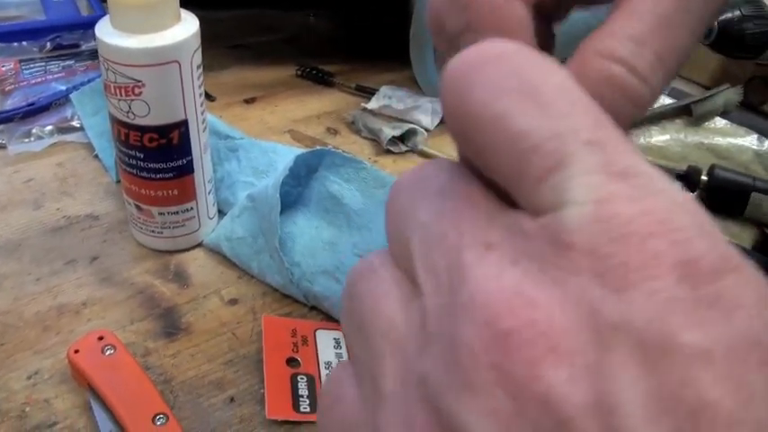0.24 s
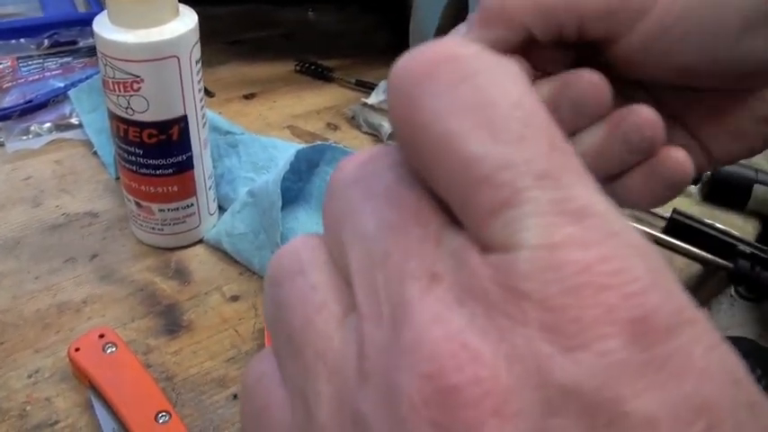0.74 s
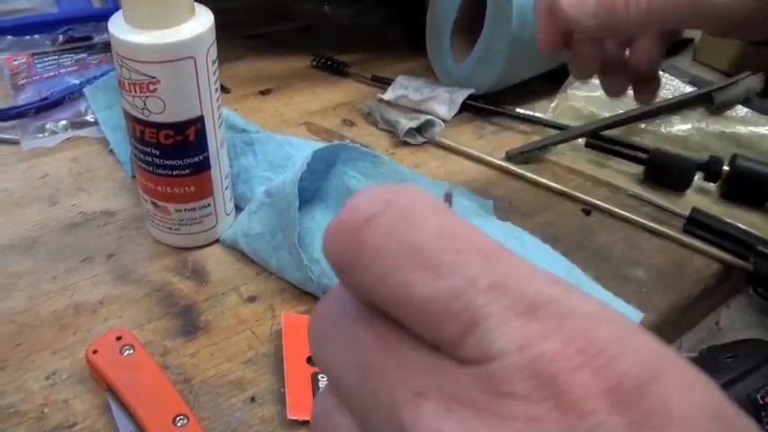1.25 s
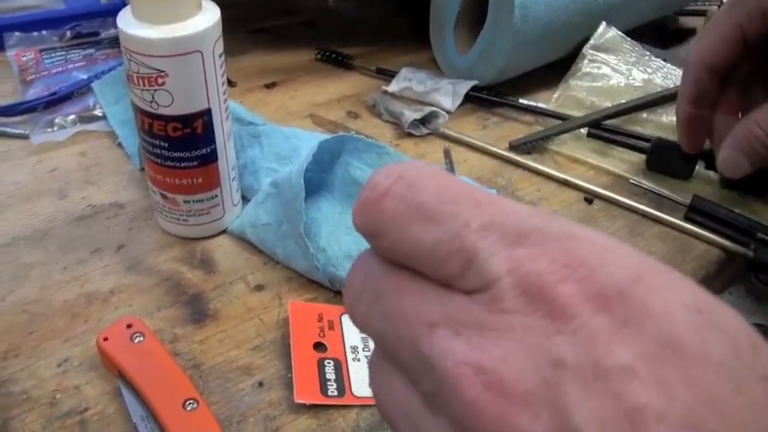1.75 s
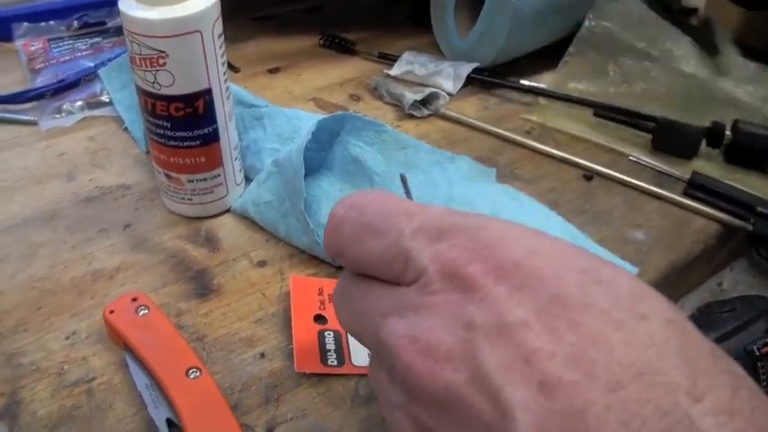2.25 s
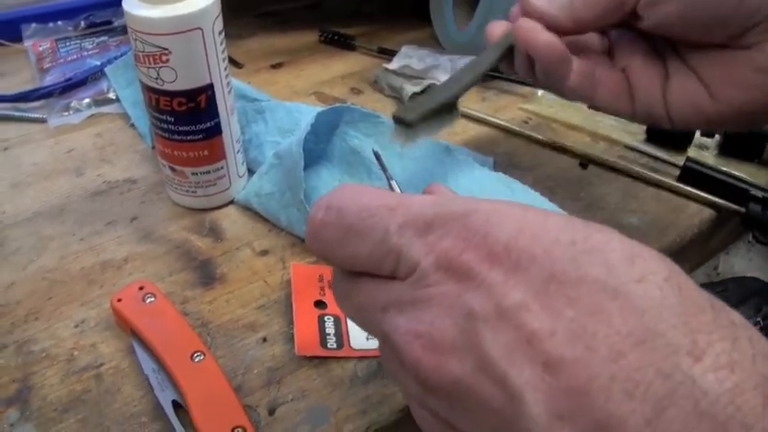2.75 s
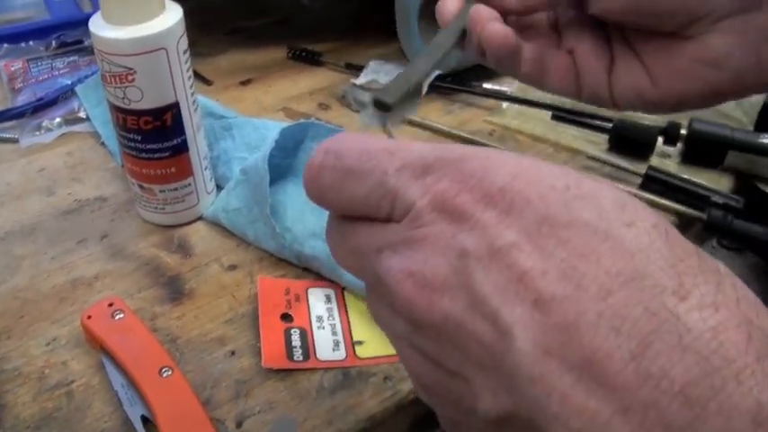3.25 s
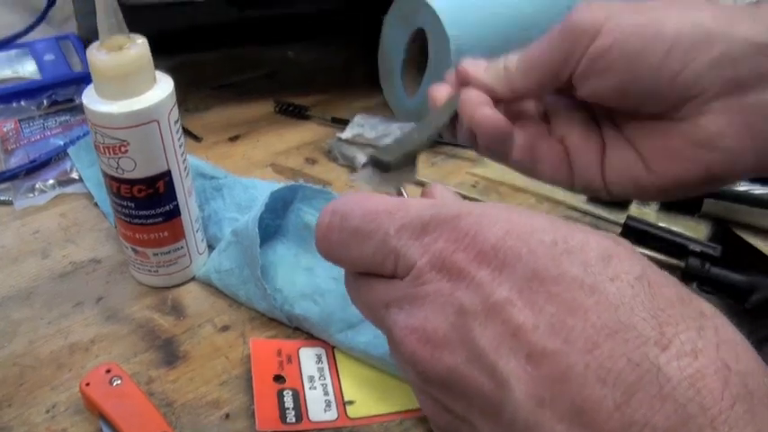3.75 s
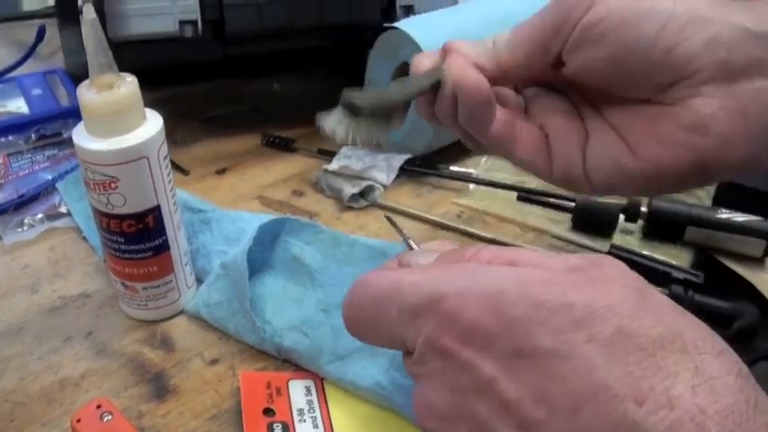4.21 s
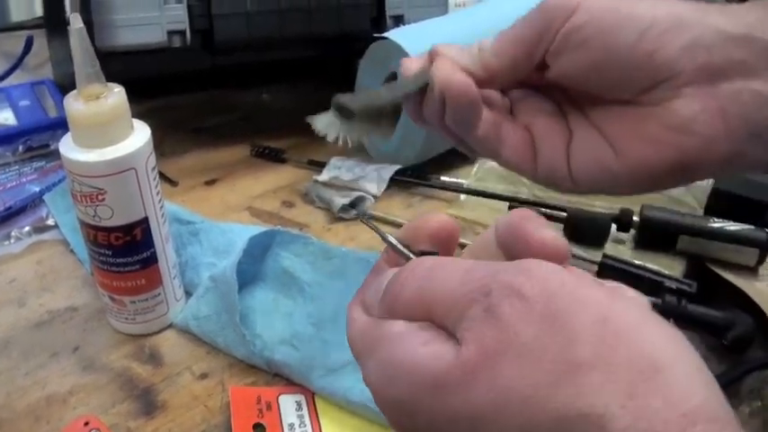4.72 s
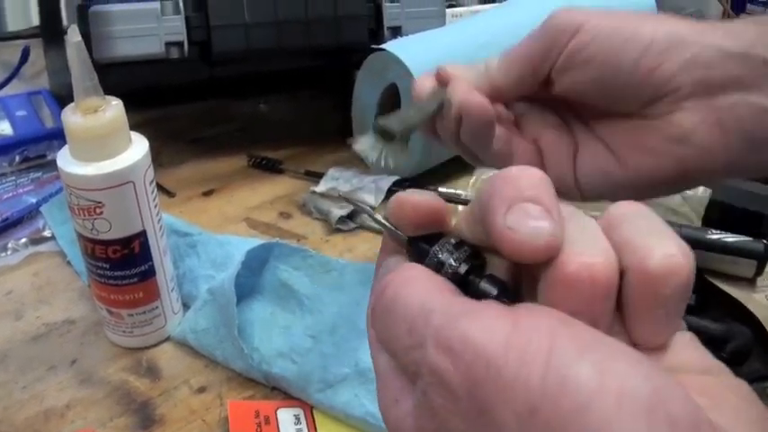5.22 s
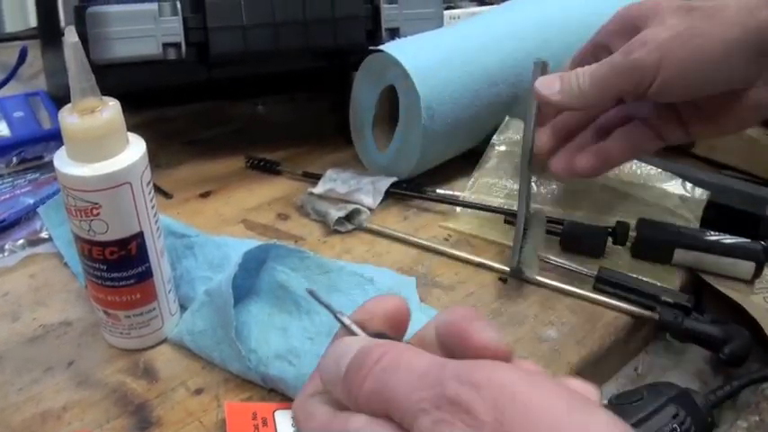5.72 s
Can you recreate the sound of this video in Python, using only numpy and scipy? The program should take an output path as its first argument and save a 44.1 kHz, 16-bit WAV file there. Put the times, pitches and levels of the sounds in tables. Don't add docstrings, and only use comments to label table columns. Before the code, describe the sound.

A small, quiet shed with soft air hiss and weak mains hum, heard closely in stereo with a short dull room tail. From 0 to 1.3 seconds, a forearm slides faintly on the wooden bench while fingers rub and nails tick a tiny metal part. After a near-quiet gap with a faint drag and dull bump, a stiff brush is tugged from a pile at 2.05 to 2.55: rods knock and ring in an irregular loud clatter, plastic film crackles and the bench booms, with a second strong cluster near 2.36. From 2.75 to 5.46, eleven short, dry, bright brush strokes come roughly every quarter second, each with snapping bristles, sharp ticks and a hollow handle scrape; later ones ring the part more. Stray knocks sound near 3.35 to 3.42. Cloth rubs near 5.6, then the brush drops back at 5.8 to 5.95 with rattling knocks, strongest near 5.89.

```python
import sys
import numpy as np
from scipy import signal
from scipy.io import wavfile

SR = 44100
rng = np.random.default_rng(int(sys.argv[2]) if len(sys.argv) > 2 else 0)


def nominal_scale(level):
    x = np.asarray(level, float) / 20
    return 10 ** x


def digitize_waveform(pressure):
    field = np.atleast_2d(pressure).T
    bounded = np.clip(field, -1, 1)
    quanta = np.round(bounded * 32767).astype(np.int16)
    wavfile.write(sys.argv[1], SR, quanta)


N = 263277


def rms_one(x):
    return x / np.sqrt(np.mean(x ** 2) + 1e-20)


def at_hz(points, hz):
    table = np.array(points)
    return np.interp(np.log(hz), np.log(table[:, 0]), table[:, 1])


def drift(rate_hz):
    r = np.exp(-20 * np.pi * rate_hz / SR)
    slow = signal.lfilter([1], [1, -2 * r, r * r], rng.standard_normal(N // 10 + 4002))[4000:]
    return np.interp(np.arange(N) / 10, np.arange(len(slow)), rms_one(slow))


def band_pass(x, order, low_hz, high_hz):
    return signal.sosfilt(signal.butter(order, [low_hz, high_hz], "band", fs=SR, output="sos"), x)


def resonance(x, hz, width_hz):
    r = np.exp(-np.pi * width_hz / SR)
    feedback = [1, -2 * r * np.cos(2 * np.pi * hz / SR), r * r]
    return signal.lfilter(np.array([1, 0, -1]) * (1 - r * r) / 2, feedback, x)


def body(x, modes, ring_db):
    return x + sum(nominal_scale(ring_db + db) * resonance(x, hz, width_hz) for hz, width_hz, db in modes)


def colour(sources, spectrum, alike=None, patchy_db=0.):
    out = 0
    bottom_hz, top_hz = spectrum[0][0], spectrum[-1][0]
    edges = np.geomspace(bottom_hz, top_hz, int(3 * np.log2(top_hz / bottom_hz)))
    flicker = nominal_scale(patchy_db * drift(86))
    for k, (low_hz, high_hz) in enumerate(zip(edges, edges[1:])):
        band = band_pass(sources[k % len(sources)], 2, low_hz, high_hz)
        hz = np.sqrt(low_hz * high_hz)
        if alike:
            c = np.clip(at_hz(alike, hz), 0, 1)
            band = np.sqrt(1 + c) * band[0] + np.sqrt(1 - c) * band[1] * [[1], [-1]]
        out = out + nominal_scale(at_hz(spectrum, hz)) * band * np.roll(flicker, 9001 * k)
    return rms_one(out)


def grains(per_s, spread_db, clump_db, clump_hz):
    born = rng.random((4, N)) < per_s / SR
    size_db = spread_db * np.minimum(rng.exponential(1, (4, N)), 4)
    sizes = nominal_scale(size_db) * rng.standard_normal((4, N))
    return born * sizes * nominal_scale(clump_db * drift(clump_hz)) + 1e-18


def levels(spans):
    t, main, low = np.arange(N) / SR, np.zeros(N), np.zeros(N)
    for rows in spans:
        s, level_db, share_db = np.transpose(rows)
        on = slice(int(s[0] * SR), int(s[-1] * SR))
        gain = nominal_scale(np.interp(t[on], s, level_db))
        main[on] += gain
        low[on] += gain * nominal_scale(np.interp(t[on], s, share_db))
    return main, low


def swells(rows):
    onset_s, start_under_db = 0.00135, 9
    spans = []
    for s, crest_s, crest_db, fade_db_per_s, share_db in rows:
        top_s = max(crest_s, s)
        spans.append([(s - onset_s, crest_db - 11, share_db), (s, crest_db - start_under_db, share_db),
                      (top_s, crest_db, share_db), (top_s + 50 / fade_db_per_s, crest_db - 50, share_db)])
    return levels(spans)


def burst(noise, t60_s):
    t = np.arange(len(noise)) / SR
    return noise * nominal_scale(-60 * t / max(t60_s, .002)) * (1 - np.exp(-t / 0.000077))


def strike(noise, hz, t60_s):
    contact = 0.19 * burst(noise, 0.011)
    contact[1] += 1
    return resonance(contact, hz, np.log(1000) / np.pi / t60_s)


def place(hits):
    out = np.zeros(N + 4096)
    for s, peak_db, shape in hits:
        i = round(s * SR)
        out[i:i + len(shape)] += nominal_scale(peak_db) * shape / np.abs(shape).max()
    return out[:N]


# pitch_hz, level_db (per Hz)
AIR_TONE = [(13, -35), (22, -2), (40, -2.5), (123, -5), (171, -2.5), (392, 2.5), (463, -0.5), (682, 3),
            (1190, 0), (1330, -1), (2180, -3), (2510, -3.5), (9220, -13), (14800, -15), (16500, -29)]
# pitch_hz, likeness (0 to 1)
AIR_LIKENESS = [(60, 0.94), (150, 0.62), (380, 0.21), (950, 0.023), (2380, 0.015), (5980, 0.2),
                (15000, 0.88)]
# pitch_hz, level_db
MAINS_HUM = [(59.8, -81.5), (119.6, -74), (239, -76.5)]


def air():
    t = np.arange(N) / SR
    waver = nominal_scale(2 * drift(4))
    hum = sum(nominal_scale(db + 1.5) * waver * np.sin(2 * np.pi * hz * t) for hz, db in MAINS_HUM)
    level_db = -56.5 + .4 * drift(3)
    return nominal_scale(level_db) * colour(rng.standard_normal((2, 2, N)), AIR_TONE, alike=AIR_LIKENESS) + hum


# start_s, crest_s, end_s, crest_db, bright_share_db
FOREARM_SLIDES = [
    (-0.1, 0.008, 0.2, -58.5, -21),
    (1.33, 1.58, 2.3, -63, -8),
    (3.623, 3.72, 4.3, -60, -6),
    (4.4, 4.444, 4.56, -51.5, -7.5),
    (4.672, 4.704, 5.2, -62.5, -9),
    (5.524, 5.635, 5.74, -55.5, -0.5),
    (5.7, 5.79, 5.83, -55, 0),
]
# pitch_hz, width_hz, level_db
BOARD = [(237, 33, -3.5), (430, 45, -1.5), (576, 180, 1), (800, 86, -6.5), (1144, 140, -2)]
# pitch_hz, width_hz, level_db
SLEEVE = [(1600, 300, -8), (1970, 200, -3), (3260, 400, -5.5), (4680, 580, -3.5), (6500, 1500, -4.5),
          (11000, 5700, -5)]


def forearm():
    edge_db, alike = 9, 0.96
    spans = []
    for s, crest_s, until_s, db, share_db in FOREARM_SLIDES:
        spans.append([(max(s, 0), db - edge_db * (s > 0), share_db), (crest_s, db, share_db),
                      (min(until_s, N / SR), db - edge_db, share_db)])
    board, sleeve = levels(spans)
    mid, side = rng.standard_normal((2, N))
    friction = np.sqrt(1 + alike) * mid + np.sqrt(1 - alike) * side * [[1], [-1]]
    friction = friction * nominal_scale(0.64 * drift(30))

    def rub(modes):
        total = 0
        for k, (hz, width_hz, db) in enumerate(modes):
            total = total + (-1) ** k * nominal_scale(db) * resonance(friction, hz, width_hz) / np.sqrt(width_hz)
        return rms_one(total)

    return (board * rub(BOARD) + sleeve * rub(SLEEVE)) * nominal_scale([[-1.1], [1.1]])


# start_s, peak_db, high_pitch_hz, low_mode_db (re peak)
NAIL_TICKS = [
    (0.61, -41, 11400, -24),
    (0.625, -41.5, 10200, -1),
    (0.635, -44, 7450, -5),
    (0.8001, -43, 6530, -25),
    (1.102, -48.5, 3300, -3),
    (1.109, -50, 7000, -12),
    (1.1894, -42, 10300, -2),
    (1.1995, -50, 6900, 5),
    (1.268, -40, 4270, -14),
]
# start_s, peak_db, high_pitch_hz, low_mode_db (re peak)
BRISTLE_TICKS = [(2.7482, -28.5, 10900, -18), (2.7605, -35, 10300, -12), (2.7779, -32, 10700, -29),
                 (3.014, -24, 7000, -43), (3.048, -30, 10300, -13), (3.0843, -26, 6800, -19),
                 (3.253, -43, 10600, -26), (3.291, -37, 7080, -27), (3.3052, -26, 10600, -18),
                 (3.32, -23, 7100, -27), (3.55, -25, 6770, -26), (3.608, -19, 5000, -22),
                 (3.8104, -23, 10300, -35), (3.818, -29, 7000, -20), (3.825, -31, 4700, -8),
                 (3.8384, -26, 11500, -21), (3.9005, -23, 11100, -20), (3.906, -27.5, 10300, -14),
                 (4.0784, -24, 10900, -3), (4.1154, -40, 12900, -19), (4.123, -34.5, 4740, -16),
                 (4.136, -33, 11400, -15), (4.143, -37, 9000, -13), (4.152, -36, 10100, -25),
                 (4.156, -20, 9600, -22), (4.1647, -25, 7010, -24), (4.167, -15, 10360, -31),
                 (4.1773, -27, 10500, -15), (4.1914, -35, 11000, -12), (4.3591, -30, 9300, -5),
                 (4.6146, -24.5, 10200, -5), (4.654, -24, 10300, -2), (4.8599, -22, 7300, -4),
                 (4.8796, -22, 10300, -11), (5.1241, -24.5, 5140, -7), (5.1248, -23, 4400, -24),
                 (5.1239, -23, 7300, -20), (5.166, -28, 9500, -22), (5.378, -35, 9450, -14),
                 (5.3836, -35, 7200, -25), (5.4, -28, 10350, -21), (5.4019, -15, 10000, -22),
                 (5.4175, -30, 10500, -20), (5.4235, -30, 11100, -21), (5.4273, -16, 11600, -39),
                 (5.4634, -20, 4350, -17)]
# pitch_hz, width_hz, level_db
METAL_PART = [(4850, 860, -3.5), (7030, 420, 4.5), (10300, 120, 3), (11600, 450, -28)]
PART_LOWEST_HZ = 3596


def ticks():
    rows = NAIL_TICKS + BRISTLE_TICKS
    hits = []
    for noise, (s, peak_db, hz, low_db) in zip(rng.standard_normal((len(rows), 2048)), rows):
        crack = body(band_pass(burst(noise, 0.011), 2, 2800, 13000), METAL_PART, ring_db=0)
        hits.append((s, peak_db - 10.5, crack))
        hits.append((s, peak_db - 4.0, strike(noise, hz, 0.0055)))
        hits.append((s, peak_db + low_db, strike(noise, PART_LOWEST_HZ, 0.011)))
    return place(hits)


# start_s, crest_s, crest_db, fade_db_per_s, low_share_db
FINGER_SLIDES = [
    (0.612, 0.626, -56.5, 200, -9),
    (0.79, 0.8, -52, 310, -8),
    (0.885, 0.915, -55, 500, -26),
    (1.112, 1.12, -56.5, 1100, -25),
    (1.186, 1.19, -50.5, 550, -24),
]
# pitch_hz, level_db (per Hz)
SKIN_TONE = [(2000, -16), (5000, -1), (9000, 5), (13000, 6), (16500, -13)]
# pitch_hz, level_db (per Hz)
HANDLE_TONE = [(150, -6.5), (250, -8.5), (938, 1.5), (1160, 2.5), (1430, 0), (1790, -5.5), (2060, 4),
               (2600, 0), (3380, -38), (5720, -120)]


def fingers():
    main, low = swells(FINGER_SLIDES)
    rub = grains(12000, spread_db=1.2, clump_db=1.5, clump_hz=80)
    return main * colour(rub, SKIN_TONE) + low * colour(rub, HANDLE_TONE)


# start_s, peak_db, low_pitch_hz, high_pitch_hz, hardness_db
TUG_KNOCKS = [(2.04, -44, 800, 1500, -8), (2.053, -40, 1840, 2980, -15), (2.0644, -7.5, 1420, 3000, 5.5),
              (2.0722, -14, 1290, 3100, 3), (2.0826, -13.5, 1890, 4000, -6), (2.092, -37, 1460, 4000, -7),
              (2.103, -28, 1300, 4000, -9), (2.125, -26, 1900, 3830, 0), (2.1312, -21, 1450, 3200, 5),
              (2.1384, -19, 1470, 4070, -2), (2.145, -16, 845, 4540, 5.5), (2.16, -29, 1960, 2380, -13.5),
              (2.173, -24, 1410, 4000, -1), (2.182, -28, 1900, 4800, -3), (2.196, -46, 800, 2400, -13),
              (2.2057, -23, 2060, 5600, 3), (2.2187, -28.5, 660, 2190, 10), (2.253, -35, 1650, 2550, -11.5),
              (2.2757, -43, 1500, 4500, 0), (2.2785, -18, 2800, 6100, -6.5), (2.295, -30, 1890, 3820, -5),
              (2.308, -27.5, 1850, 5000, -12), (2.3178, -31, 1900, 4000, -7), (2.335, -38, 1700, 3300, 0),
              (2.349, -27, 1400, 6200, 8),
              (2.359, -23, 580, 5470, 9), (2.363, -12, 975, 3580, 10), (2.3702, -14.5, 576, 3520, 5),
               (2.3787, -8.5, 2310, 7200, -8), (2.384, -8, 2220, 3140, 2), (2.4, -17.5, 1560, 2500, 3),
               (2.407, -26, 1540, 2510, -10), (2.412, -37, 1800, 3700, -3), (2.421, -46, 2000, 9000, 3),
               (2.432, -44, 1360, 2300, -10), (2.438, -33.5, 1790, 3240, -6), (2.443, -34, 990, 2780, -2),
               (2.45, -44, 1800, 2900, -4), (2.47, -43, 1900, 6200, 10), (2.478, -33, 1980, 2970, -7),
               (2.4872, -25, 2130, 3900, -2), (2.496, -38, 1500, 4200, -4), (2.506, -26, 1530, 3020, 6),
               (2.5091, -22, 1800, 5000, -3), (2.529, -47, 1200, 2600, 4), (2.536, -34.5, 1000, 4080, -6),
               (2.5482, -15.5, 2150, 7100, -2.5), (2.622, -45.5, 1410, 2260, -7),
               (2.669, -44, 2010, 2300, -3)]
# start_s, peak_db, low_pitch_hz, high_pitch_hz, hardness_db
DROP_KNOCKS = [(0.6227, -44, 1900, 2160, 0), (0.637, -44.5, 1100, 2070, -6), (0.8806, -40, 860, 2310, -5.5),
               (1.268, -49.5, 1800, 2700, -10), (1.3027, -55, 1600, 2430, -15),
               (1.6195, -51, 980, 1420, -12), (3.3515, -22, 1510, 6040, -2.5),
               (3.415, -28.5, 1530, 4600, -14), (3.4153, -41, 2070, 3400, -3),
               (3.4178, -30.5, 1090, 6500, -1), (5.808, -30, 1890, 8040, 11), (5.812, -32, 1490, 6600, -13),
               (5.817, -26.5, 1800, 5340, -5), (5.825, -39, 1700, 3300, 3), (5.8465, -17, 1630, 3900, -2.5),
               (5.8511, -35.5, 1600, 2900, -18), (5.8526, -35, 1600, 2600, -17),
               (5.857, -38, 1600, 5200, -17), (5.881, -33, 1300, 2310, -9), (5.885, -17, 1600, 8100, -2),
               (5.886, -10, 2950, 4160, -2.5), (5.886, -15.5, 1900, 4230, 1), (5.8863, -17, 910, 6500, 6),
               (5.927, -40, 1980, 6500, -13), (5.9222, -32, 2000, 8000, 6), (5.946, -32, 1560, 4100, -7)]


def knocks():
    low_cycles, high_cycles = 14, 24.4
    rows = TUG_KNOCKS + DROP_KNOCKS
    hits, thumps = [], []
    for noise, (s, peak_db, low_hz, high_hz, hard_db) in zip(rng.standard_normal((len(rows), 4096)), rows):
        low_peak_db, crack_peak_db = peak_db - 7 - hard_db, peak_db - 6 + hard_db
        rattle_peak_db = peak_db - 10.5 + 0.55 * min(hard_db + 4, 0)
        low_t60_s = low_cycles * nominal_scale(-0.29 * hard_db) / low_hz
        other = noise[::-1]
        hits.append((s, low_peak_db, strike(noise, low_hz, low_t60_s)))
        hits.append((s, peak_db - 1, strike(noise, high_hz, high_cycles / high_hz)))
        hits.append((s, low_peak_db - 10.5, strike(other, np.sqrt(low_hz * high_hz), 4.5 / low_hz)))
        hits.append((s, rattle_peak_db, band_pass(burst(other, .06), 1, 1200, 7000)))
        hits.append((s, crack_peak_db, band_pass(burst(noise, .006), 2, 5500, 13000)))
        push = burst(other, 0.0015)
        thump = resonance(push, 277, 38) + resonance(push, 460, 126) + resonance(push, 550, 150)
        thumps.append((s, low_peak_db - 20.5, thump))
    return place(hits), place(thumps)


# start_s, peak_db, low_pitch_hz, upper_pitch_hz, push_s
HAND_BUMPS = [(1.806, -49, 154, 290, 0.037), (2.998, -43.5, 580, 249, 0.015), (2.999, -49, 127, 230, 0.068),
              (3.798, -57, 50, 88.5, 0.046), (4.439, -57, 54, 89, 0.039), (5.752, -52, 135, 100, 0.028),
              (5.845, -47, 144, 275, 0.024), (2.158, -43.5, 131, 250, 0.036),
              (2.35, -37.5, 184, 239, 0.034), (5.88, -31, 276, 430, 0.018), (1.812, -47, 630, 880, 0.022),
              (5.122, -43, 420, 750, 0.0042)]


def bumps():
    def dull(push, hz):
        return resonance(resonance(push, hz, 0.33 * hz), hz, 0.33 * hz)

    t, hits = np.arange(4096) / SR, []
    noises = rng.standard_normal((len(HAND_BUMPS), 4096))
    for noise, (s, peak_db, low_hz, upper_hz, push_s) in zip(noises, HAND_BUMPS):
        push = noise * np.sin(np.pi * np.minimum(t / push_s, 1)) ** 2
        hits.append((s, peak_db, dull(push, low_hz) + nominal_scale(-5.0) * dull(push, upper_hz)))
    return place(hits)


# start_s, crest_s, crest_db, fade_db_per_s, bench_boom_db
WRAP_CRUMPLES = [(2.052, 2.058, -32, 700, -11), (2.061, 2.066, -18.5, 1500, -12.5),
                 (2.0715, 2.074, -26.5, 1100, -6), (2.081, 2.085, -26.5, 800, -8),
                 (2.09, 2.095, -42, 295, -1), (2.12, 2.15, -31, 446, -11.5), (2.19, 2.2, -37.5, 275, -6.5),
                 (2.2762, 2.278, -29, 1300, -8), (2.306, 2.308, -34.5, 300, -10.5),
                 (2.325, 2.353, -35, 909, -13), (2.358, 2.363, -19.5, 552, -6.5),
                 (2.376, 2.39, -25.5, 1600, -23), (2.396, 2.41, -37, 2090, 4),
                 (2.47, 2.495, -57.5, 254, 3.5), (2.545, 2.549, -32.5, 1097, -23),
                 (2.038, 2.042, -68, 900, 14), (5.8035, 5.807, -37.5, 302, -8),
                 (5.825, 5.835, -42, 891, -19), (5.847, 5.85, -34, 800, -6.5), (5.86, 5.87, -64, 150, 16.5),
                 (5.885, 5.887, -30, 1550, -11), (5.915, 5.935, -47.5, 180, 1.5)]
# pitch_hz, level_db (per Hz)
FILM_TONE = [(530, 4.5), (900, 1.5), (1050, 2.5), (1290, 7.5), (3260, 1.5), (6640, 2.5), (7400, -2),
             (12000, -4), (14000, -9), (15500, -29)]
# pitch_hz, level_db (per Hz)
BENCH_TONE = [(35, -31), (60, -8), (215, 1), (275, 7.5), (435, -4), (580, 7), (922, -0.5), (1060, -15),
              (1200, 0), (1560, -49), (2640, -120)]


def wrap():
    main, low = swells(WRAP_CRUMPLES)
    creases = grains(4500, spread_db=2.5, clump_db=1.6, clump_hz=120)
    film = main * colour(creases, FILM_TONE, patchy_db=1.6)
    boom = low * colour(creases, BENCH_TONE, patchy_db=1.6)
    return film, boom


# start_s, end_s, landing_db, drag_db
BRISTLE_TOUCHES = [(2.736, 2.768, -55, -49), (3.016, 3.048, -37, -47), (3.296, 3.33, -60, -41),
                   (3.555, 3.577, -48, -33), (3.8105, 3.836, -41, -41.5), (4.075, 4.177, -33, -56),
                   (4.15, 4.172, -50, -44), (4.355, 4.371, -48, -47), (4.616, 4.633, -32, -60),
                   (4.863, 4.878, -31.5, -54), (5.129, 5.15, -50, -41), (5.375, 5.394, -54, -39),
                   (5.398, 5.435, -29, -38)]
# start_s, lift_s, start_db, lift_db, part_ring_db (its lowest mode)
BRUSH_SWEEPS = [(2.775, 2.821, -34.5, -39.5, -2), (3.058, 3.085, -32, -26, -24),
                (3.32, 3.352, -33.5, -25.5, -29), (3.581, 3.617, -27.5, -29.5, -9),
                (3.851, 3.908, -26.5, -39, 3.5), (4.167, 4.202, -31, -52.5, 6),
                (4.373, 4.417, -31, -32.5, 10.5), (4.637, 4.687, -31, -30.5, 8),
                (4.887, 4.928, -29.5, -28.5, 0.5), (5.153, 5.179, -28, -26, 0),
                (5.431, 5.462, -27, -23, 2.5)]
HAND_GRIP = [0.41, 1.9, 0.55, 1.1, 2.2, 1.6, 4.6, 5.2, 5.2, 8.5, 2.3]


def strokes():
    handle, ring = [], []
    for s, until_s, landing_db, drag_db in BRISTLE_TOUCHES:
        landing = [(s, landing_db), (s + 30 / 995, landing_db - 30)]
        drag = [(s, drag_db), (until_s, drag_db)]
        for span in (landing, drag):
            handle.append([(*corner, -21) for corner in span])
            ring.append([(*corner, -2) for corner in span])
    rise_db_per_s, lift_db_per_s, arch_db = 1900, 1700, 3.0
    for (s, lift_s, start_db, lift_db, ring_db), grip_db in zip(BRUSH_SWEEPS, HAND_GRIP):
        span = [(s - 20 / rise_db_per_s, start_db - 20), (s, start_db),
                ((s + lift_s) / 2, (start_db + lift_db) / 2 + arch_db),
                (lift_s, lift_db), (lift_s + 40 / lift_db_per_s, lift_db - 40)]
        first_db = -20.5 + grip_db
        last_db = first_db + 160 * (lift_s - s)
        shares_db = [first_db, first_db, (first_db + last_db) / 2, last_db, last_db + 2]
        handle.append([(*corner, share_db) for corner, share_db in zip(span, shares_db)])
        ring.append([(*corner, ring_db) for corner in span])
    main, low = levels(handle)
    return main, low, levels(ring)[1]


# pitch_hz, level_db (per Hz)
BRISTLE_TONE = [(1060, -70), (1800, -8.5), (2390, -15), (2840, -6.5), (3640, -1.5), (5850, -1), (8910, 1),
                (10200, 6.5), (13000, 2), (16000, -11)]
# pitch_hz, width_hz, level_db
HANDLE_BODY = [(710, 200, 0.5), (952, 110, 1), (1400, 260, 0)]


def brush():
    main, low, ring = strokes()
    snaps = grains(9000, spread_db=1.6, clump_db=.3, clump_hz=150)
    bristles = colour(snaps, BRISTLE_TONE, patchy_db=-2.5)
    rasp = body(main * bristles, METAL_PART, ring_db=-7.0)
    part_ring = resonance(ring * bristles, PART_LOWEST_HZ, 470)
    scrape = body(low * colour(snaps, HANDLE_TONE, patchy_db=2.5), HANDLE_BODY, ring_db=0)
    return nominal_scale(-4.0) * (rasp + part_ring + scrape)


def clutter(x):
    echo = band_pass(burst(rng.standard_normal(1024), 0.0099), 2, 6000, 11500)
    echo = echo / np.sqrt(np.sum(echo ** 2))
    return nominal_scale(-21) * signal.fftconvolve(x, echo)[:N] * [[1], [-1]]


def shed(x):
    t60_s, tail_db = 0.21, -18.5
    t = np.arange(SR // 2) / SR
    tail = rng.standard_normal((2, len(t))) * nominal_scale(-60 * t / t60_s) * (t > .0015)
    tail = band_pass(tail, 1, 300, 6600)
    tail = tail / np.sqrt(np.sum(tail ** 2, axis=1, keepdims=True))
    return nominal_scale(tail_db) * signal.fftconvolve(x[None], tail, axes=1)[:, :N]


def scene():
    film, boom = wrap()
    rods, thumps = knocks()
    near, pile = brush() + fingers() + ticks(), film + rods
    below = boom + thumps + bumps()
    direct = near * nominal_scale([[-.2], [.2]]) + pile * nominal_scale([[-1.4], [1.3]]) + below * nominal_scale([[-.3], [.3]])
    reflections = clutter(near + nominal_scale(1.5) * pile) + shed(nominal_scale(-1.5) * near + pile)
    return direct + reflections + air() + forearm()


def top_cut(x):
    return signal.sosfilt(signal.butter(12, 16660, fs=SR, output="sos"), x)


def record(dry):
    top_hz = 15700
    mix = signal.sosfilt(signal.cheby2(10, 40, top_hz + 500, fs=SR, output="sos"), dry)
    return top_cut(mix)


dry = scene()
out = record(dry)
digitize_waveform(out)
```